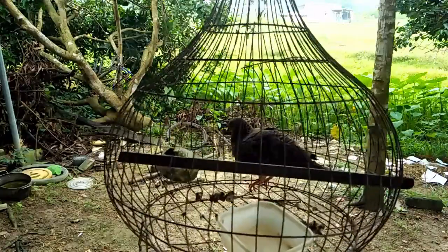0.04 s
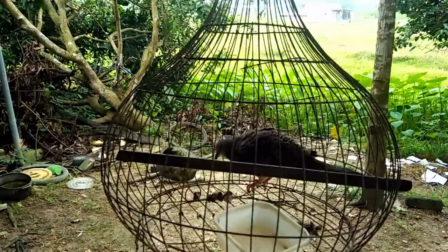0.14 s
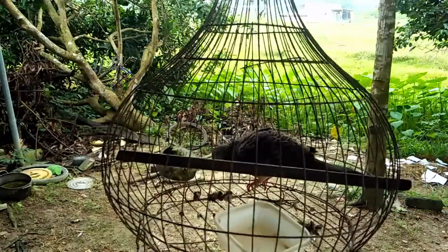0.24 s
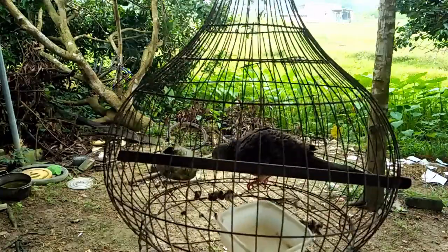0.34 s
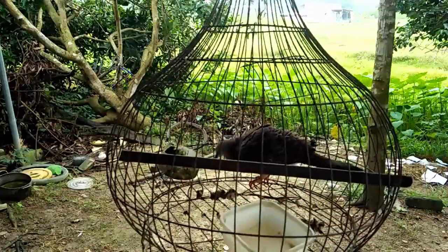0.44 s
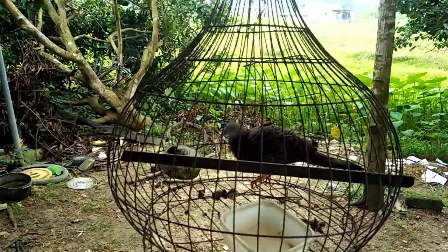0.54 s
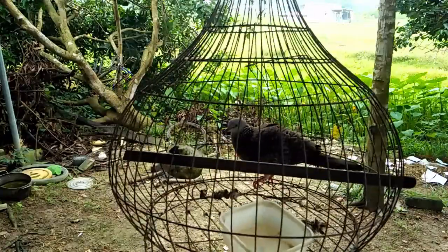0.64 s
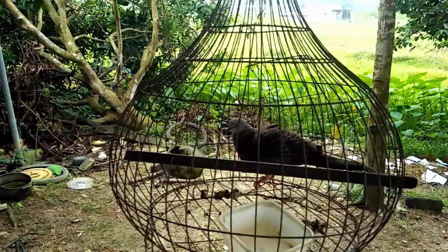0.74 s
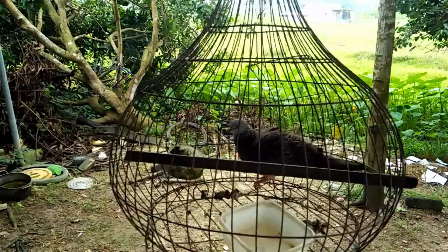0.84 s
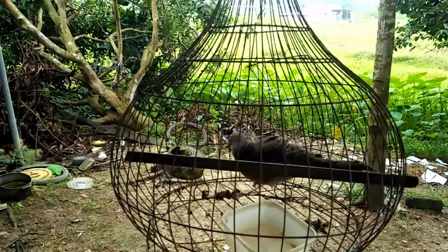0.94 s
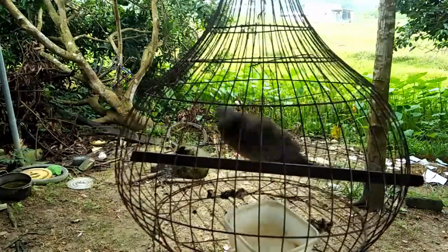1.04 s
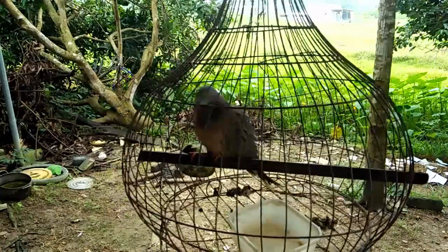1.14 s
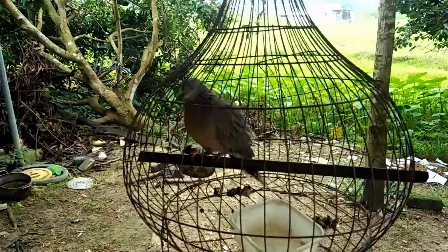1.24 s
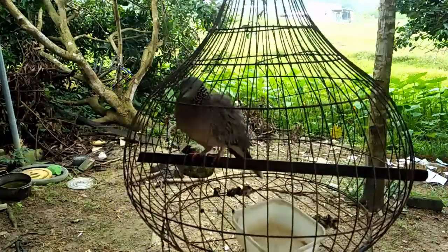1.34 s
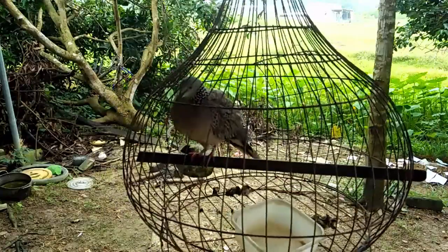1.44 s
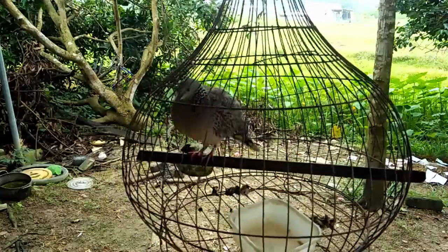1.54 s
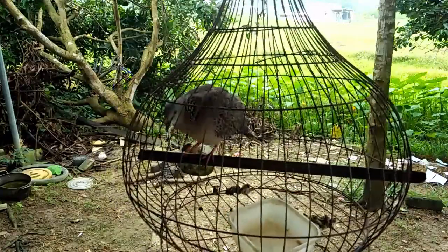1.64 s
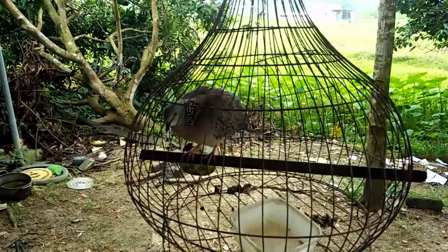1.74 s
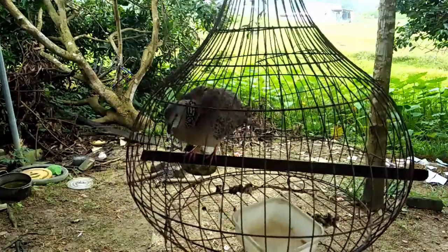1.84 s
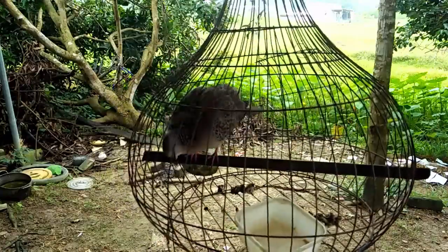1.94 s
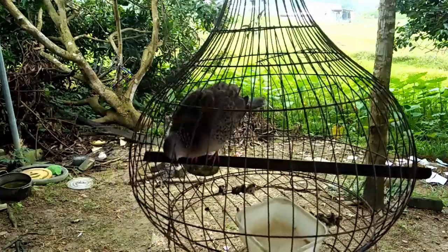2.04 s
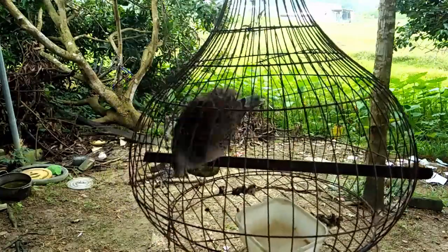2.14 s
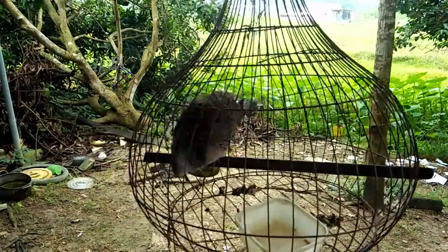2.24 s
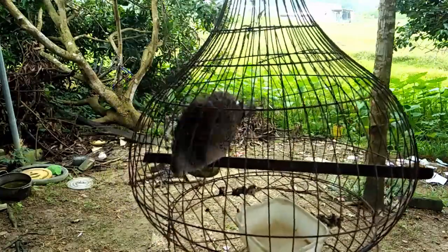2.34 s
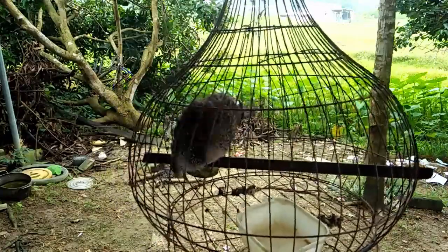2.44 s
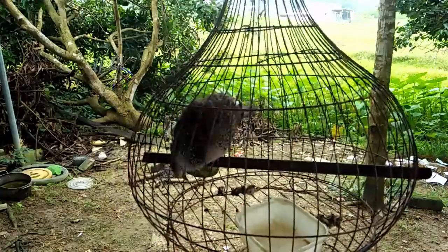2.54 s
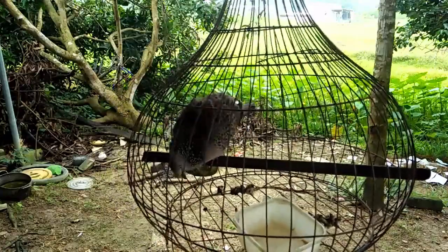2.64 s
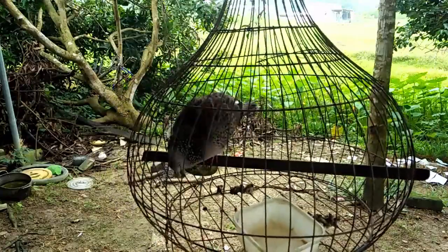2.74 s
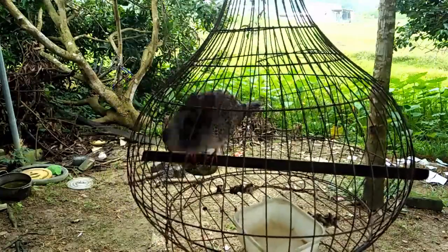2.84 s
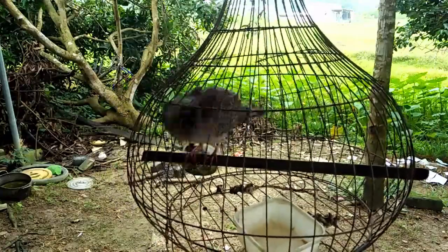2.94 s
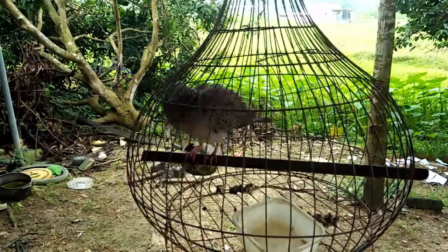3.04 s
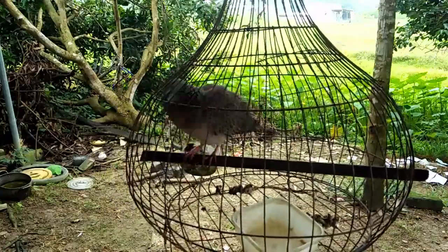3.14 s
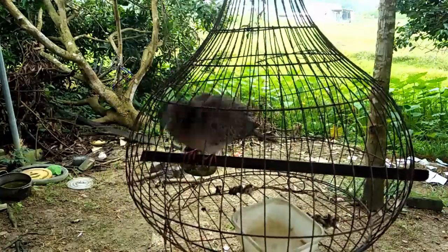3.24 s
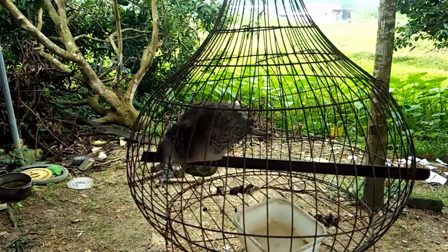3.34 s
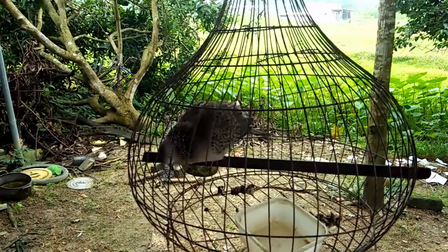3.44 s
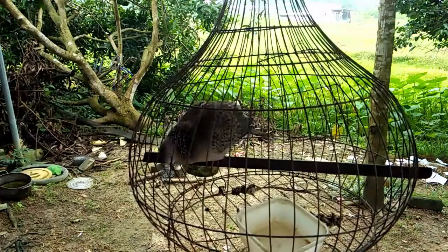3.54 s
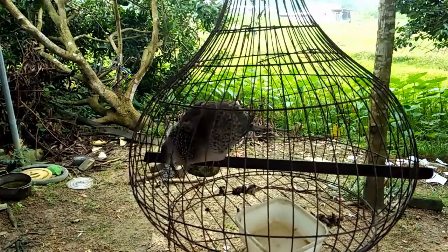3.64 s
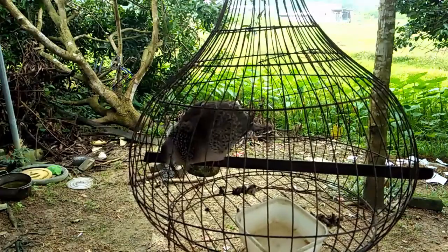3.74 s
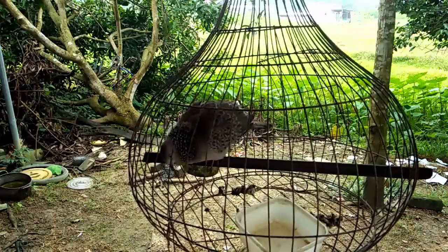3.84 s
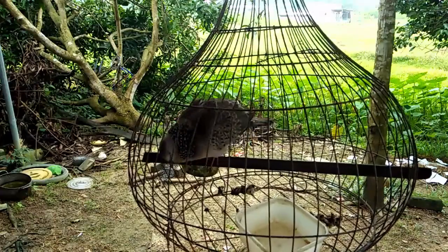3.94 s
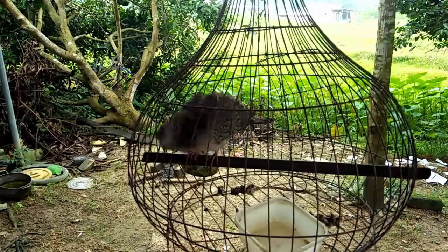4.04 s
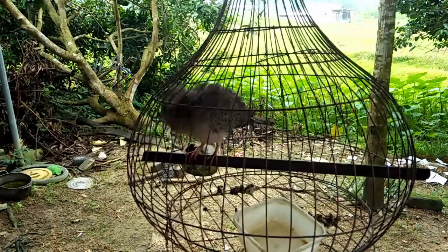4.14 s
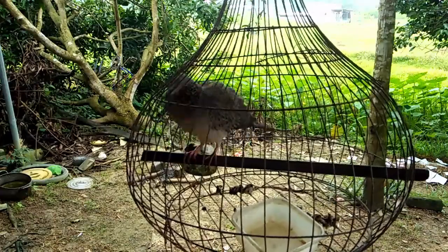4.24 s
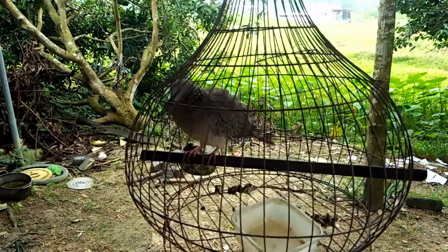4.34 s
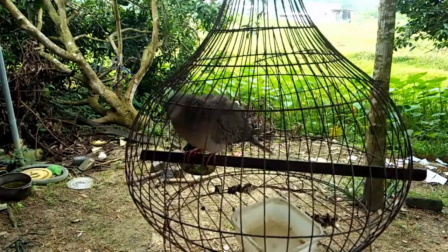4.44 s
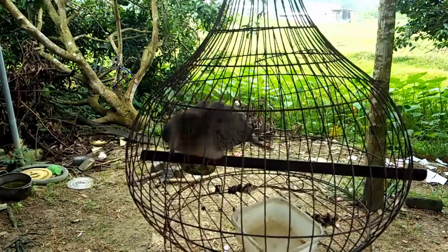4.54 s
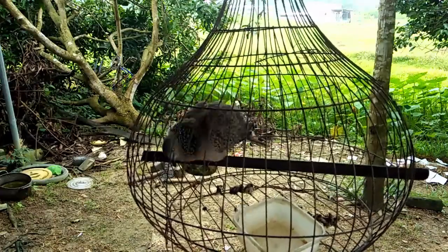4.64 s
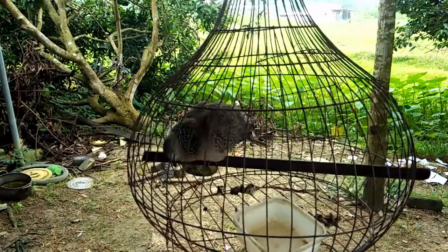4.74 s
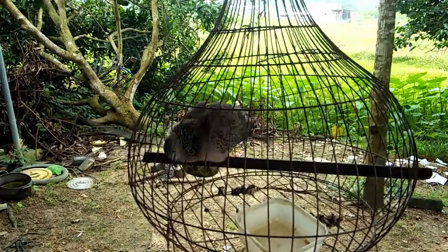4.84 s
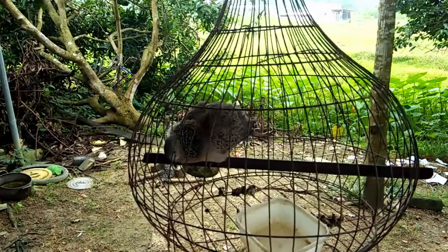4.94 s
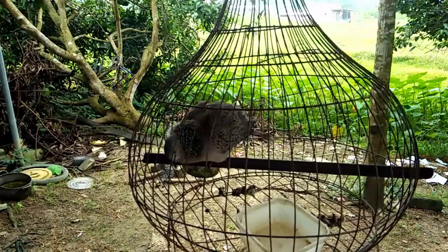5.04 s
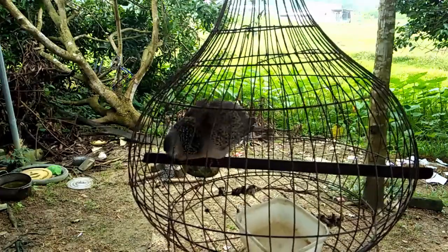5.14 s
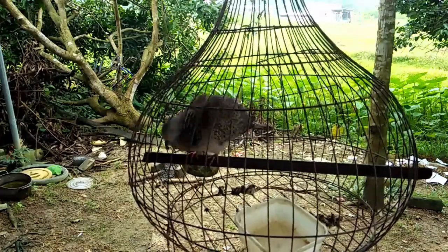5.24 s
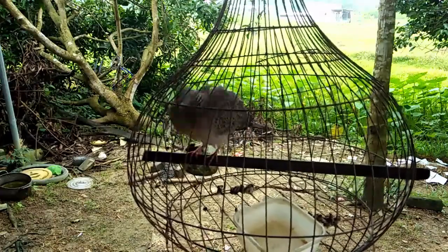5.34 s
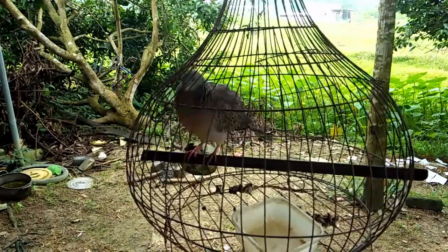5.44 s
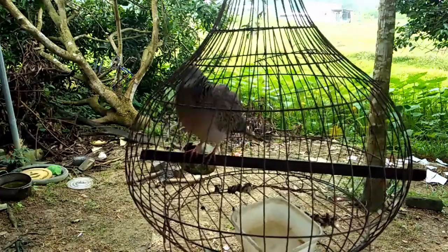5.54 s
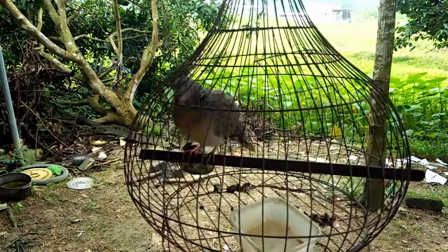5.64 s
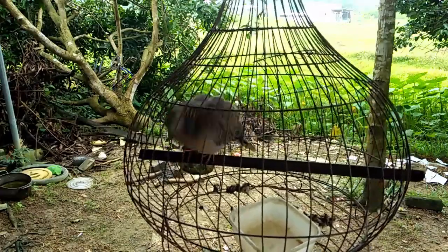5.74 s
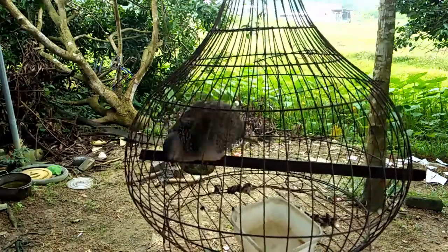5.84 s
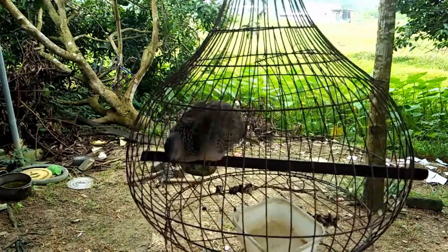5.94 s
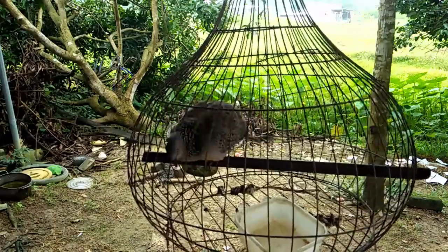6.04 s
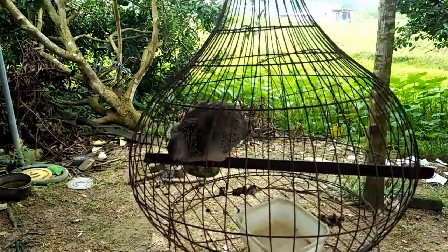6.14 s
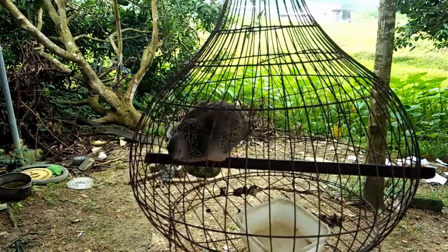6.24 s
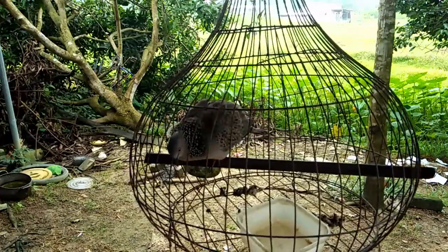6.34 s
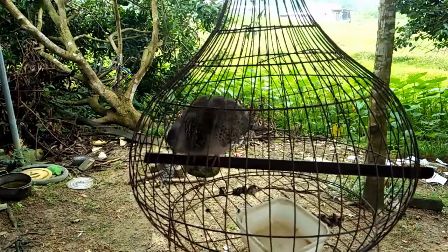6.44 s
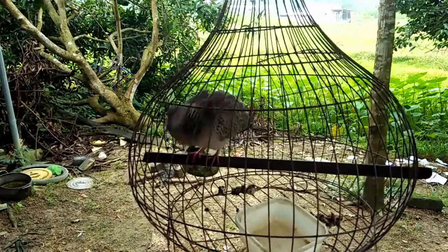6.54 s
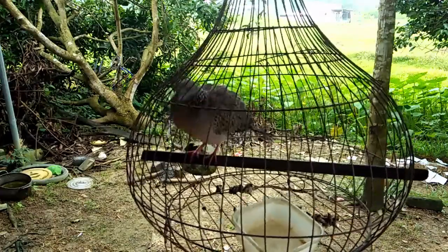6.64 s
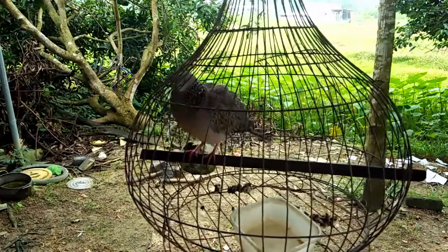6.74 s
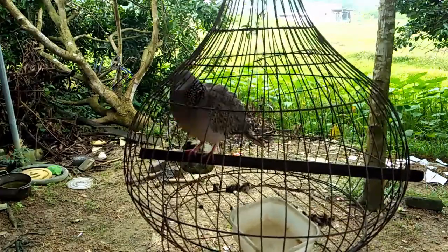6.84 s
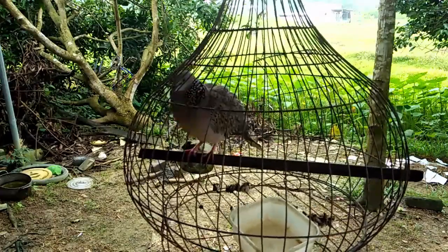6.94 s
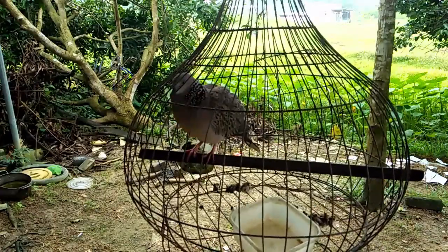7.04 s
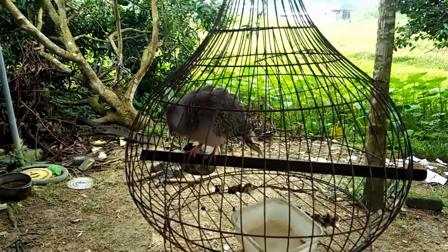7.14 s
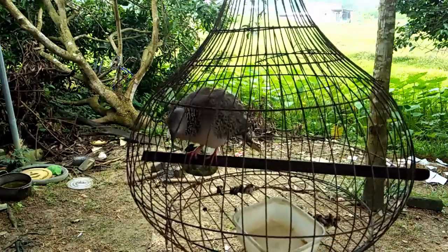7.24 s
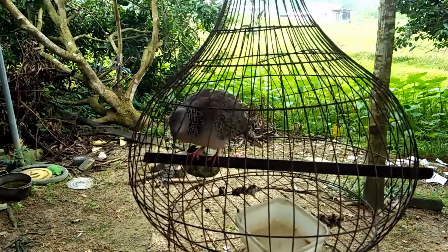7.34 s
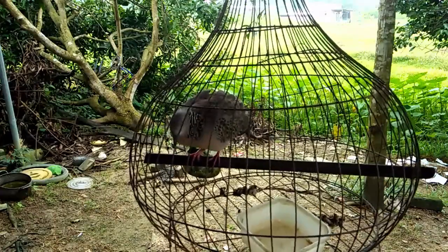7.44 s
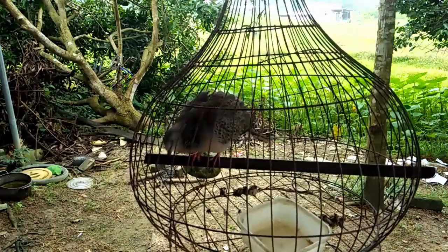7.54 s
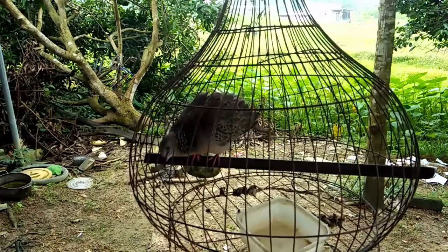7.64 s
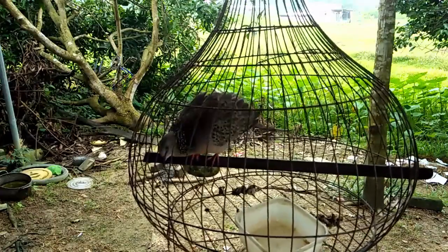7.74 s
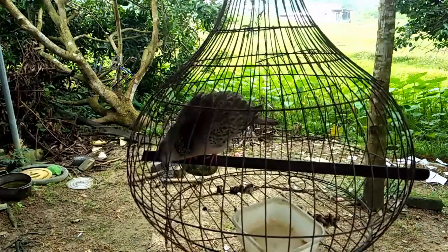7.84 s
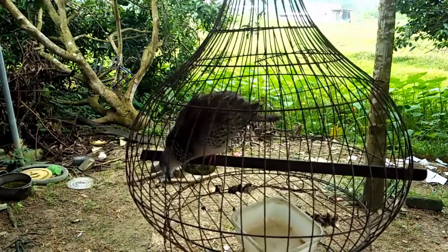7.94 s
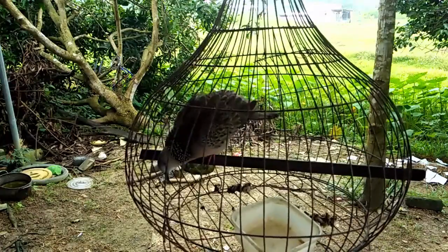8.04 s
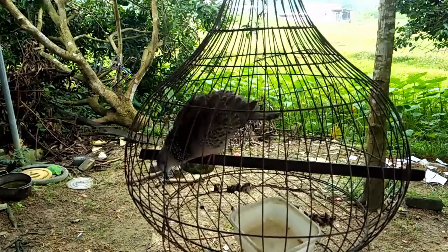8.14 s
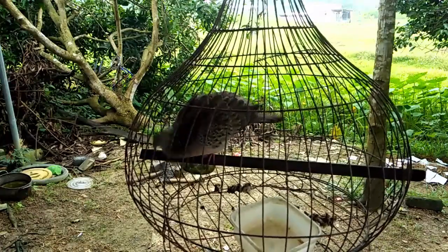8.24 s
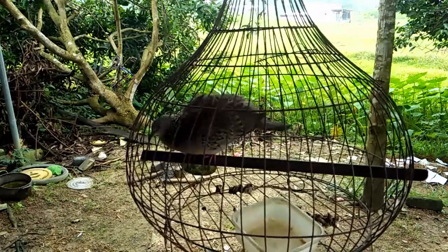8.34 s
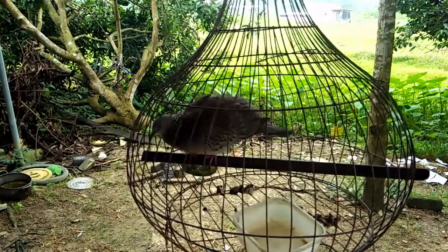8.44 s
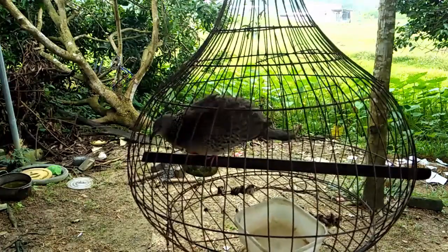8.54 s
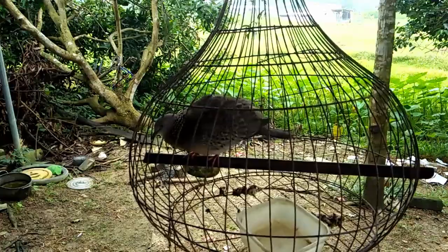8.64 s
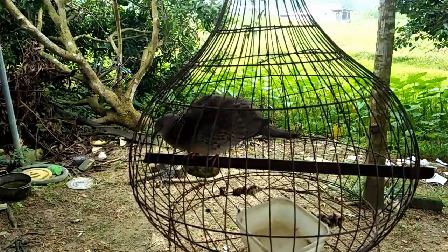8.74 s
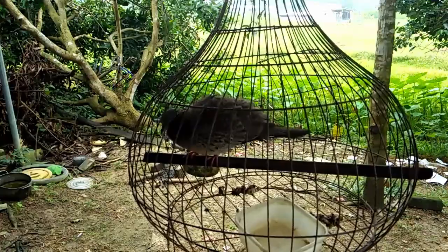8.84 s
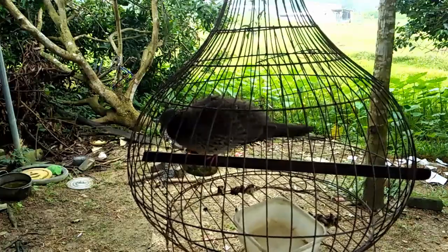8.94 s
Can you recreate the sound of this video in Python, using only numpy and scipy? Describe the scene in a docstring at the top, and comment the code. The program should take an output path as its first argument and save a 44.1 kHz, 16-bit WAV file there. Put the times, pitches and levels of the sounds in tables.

```python
"""A dove coos in pairs, short then long, close to a phone in a garden; another answers from further off.
Its gliding, rolling coo rings at two resonances, played as an upper and a lower band. Fowl call far away,
claws scrape the perch, and wind bumps the microphone over a bed of leaves and distant traffic.
The phone changes its sample rate by dropping samples, which adds faint high images of the coos."""
import sys
import numpy as np
from scipy import signal
from scipy.fft import rfft, irfft, next_fast_len
from scipy.io import wavfile
from scipy.ndimage import uniform_filter1d, map_coordinates

SR = 44100
rng = np.random.default_rng(int(sys.argv[2]) if len(sys.argv) > 2 else 0)


def file_out(sig):
    """Save sig as 16-bit WAV at sys.argv[1]."""
    # one column per channel
    cols = np.atleast_2d(sig).T
    # limit, then scale
    lim = np.clip(cols, -1, 1)
    pcm = np.round(lim * 32767).astype(np.int16)
    wavfile.write(sys.argv[1], SR, pcm)


N = 396018
T = np.arange(N) / SR

# The near dove's short coos: (start [s], length [s], level [dB], upper band [Hz],
# sag of the lower band [Hz], fade of the upper band [dB], throat click [dB])
SHORT_CALLS = [(2.199, 0.2081, -22.5, 722.9, 130, 16.5, -38.5), (3.374, .23, -23.5, 726, 9.2, 1, -45),
               (4.593, .21, -21.5, 720.8, 20, 6, -44.5), (5.837, .21, -22, 721, 9.4, 1, -47)]


def undb(db):
    """Gain of a dB value."""
    return 10 ** (np.asarray(db) / 20)


def unit(x):
    """Scaled to rms 1."""
    return x / np.sqrt(np.mean(np.abs(x) ** 2))


def colour(x, points):
    """EQ with a curve of (frequency [Hz], gain [dB]) points."""
    hz, db = np.transpose(points)
    size = next_fast_len(N)
    bin_hz = np.arange(size // 2 + 1) * SR / size + 1
    gain = undb(np.interp(np.log(bin_hz), np.log(hz), db))
    return irfft(rfft(x, size) * gain, size)[:N]


def wobble(width_hz, size=N):
    """Narrow-band complex noise: a wandering level and phase."""
    noise = rng.standard_normal((2, size // 8 + 600))
    lowpass = signal.butter(2, np.clip(width_hz, .1, 2000) / 2, fs=SR / 8, output="sos")
    slow = signal.sosfilt(lowpass, noise)[:, 598:]
    real, imag = (np.interp(np.arange(size) / 8, np.arange(len(part)), part) for part in slow)
    return unit(real + 1j * imag)


def drift(rate_hz):
    """Smooth random modulation of rms 1."""
    return unit(wobble(2 * rate_hz).real)


def garden(level_db=-70):
    """A bed of leaves and distant traffic, swelling a little."""
    # Tone of the bed: (frequency [Hz], gain [dB])
    bed_eq = [(150, -24.5), (230, -6.5), (800, -3.5), (1000, -1), (2500, -14), (9800, -25), (11500, -24),
              (13500, -44.5), (15600, -70)]
    return undb(level_db + 0.67 * drift(1.5)) * unit(colour(rng.standard_normal(N), bed_eq))


def wind(rumble_db=-63.5, gust_db=3, bump_hz=106, weak_count=10, weak_db=-44.5):
    """Gusty turbulence on the microphone, with low bumps of about a cycle and a half."""
    # Tone of the rumble: (frequency [Hz], gain [dB])
    rumble_eq = [(20, -27.5), (35, -10.5), (50, -0.5), (125, -1.5), (160, -2.5), (200, -22.5), (260, -40)]
    # Placed bumps: (time [s], peak [dB])
    placed_bumps = [(0.293, -46), (0.375, -45), (0.396, -49), (2.034, -46.5), (3.746, -43), (3.971, -44),
                    (5.83, -50.5), (5.86, -44), (5.914, -41), (7.461, -41), (7.521, -45.5), (7.698, -45)]
    gusts = undb(gust_db * drift(41) + 2.0 * drift(1.0))
    out = undb(rumble_db) * unit(colour(gusts * rng.standard_normal(N), rumble_eq))
    chance_bumps = [(time, weak_db) for time in rng.uniform(.1, T[-1] - .1, weak_count)]
    t = T[:SR // 10] - T[SR // 20]
    for time, db in chance_bumps + placed_bumps:
        detune, phase = rng.standard_normal(2)
        hz = bump_hz * np.exp(.12 * detune)
        envelope = undb(db) * np.exp(-(t * hz / 0.67) ** 2)
        at = int(time * SR) - SR // 20
        out[at:at + len(t)] += envelope * np.cos(2 * np.pi * (hz * t + phase))
    return out


def distant_calls():
    """Far-off birds, mostly fowl: each partial flickers in level and pitch within its width."""
    # Partials and hoarse bands: (start [s], length [s], pitch [Hz], width [Hz], level [dB])
    # The last row is the faint, hoarse third harmonic of the far dove's last coo.
    partials = [(0.16, 0.18, 658, 30, -76), (0.157, 0.18, 980, 30, -69.5), (.58, 0.14, 290, 25, -72),
                (0.598, 0.027, 1050, 60, -67), (1.966, 0.23, 658, 40.3, -66),
                (2.043, 0.16, 993, 22.4, -66.5), (2.047, .1, 1300, 90, -67), (4.28, 0.17, 1445, 254, -59),
                (4.558, 0.045, 1977, 248, -61.5), (4.558, 0.062, 717, 80.5, -46.5),
                (5.499, 0.055, 1655, 201, -66), (5.53, 0.17, 1175, 35, -70.5),
                (6.454, 0.14, 1499, 800, -57.5), (6.455, .07, 2820, 1018, -65),
                (7.493, 0.23, 1476, 29.9, -65.5), (7.683, 0.27, 1000, 151, -64.5),
                (7.689, 0.17, 787, 60, -68.5), (7.72, 0.27, 1505, 35, -62.5), (7.736, .26, 1624, 25, -61.5),
                (7.74, .58, 1727, 850, -65.5), (7.738, .2, 2920, 120, -80), (8.032, 0.2, 2850, 150, -76.5),
                (7.759, 0.099, 1990, 80, -69), (8.058, 0.17, 2020, 200, -72),
                (7.927, 0.16, 780, 39.2, -60.5), (7.943, 0.29, 969, 100, -61.5),
                (7.969, .3, 1513, 40, -55.5), (8.27, 0.102, 1520, 30, -70), (8.606, .36, 2010, 197, -76.5)]
    out = np.zeros(N)
    for start, length, hz, width_hz, db in partials:
        at = int(start * SR)
        t = T[:int(length * SR)]
        envelope = undb(db) * np.sin(np.pi * t / length).clip(0) ** 0.42
        tone = (wobble(width_hz, size=len(t)) * np.exp(2j * np.pi * hz * t)).real
        out[at:at + len(t)] += envelope * tone
    return np.sqrt(2) * out


def claws():
    """A bright tick, then a grainy scrape that swells and dies away, coloured by perch and wire."""
    # Claw strokes: (time [s], rise [s], scrape level [dB], relative tick level [dB])
    strokes = [(1.162, .011, -55, -80), (1.196, .011, -61, -80), (1.247, .002, -64, -50),
               (1.2575, .013, -61, -38), (4.035, .012, -64, -80)]
    # Resonances of the perch: (frequency [Hz], gain [dB])
    perch_eq = [(500, -15), (900, -4), (1700, -13), (2600, -3), (3800, -32), (5400, -15.5), (8600, -10),
                (13600, -20), (15500, -27)]
    scrape, ticks = np.zeros(N), np.zeros(N)
    for time, rise, scrape_db, tick_db in strokes:
        age = (T - time).clip(0) / rise
        scrape += undb(scrape_db) * age * np.exp(1 - age)
        ticks[int(time * SR)] = undb(tick_db)
    grain = unit(colour(rng.standard_normal(N) * undb(0.83 * drift(370)), perch_eq))
    return scrape * grain + undb(22.5) * colour(np.gradient(ticks), perch_eq)


def echo(x, t60_s=0.38, level_db=-13, predelay_s=.025):
    """Walls and trees send back a short, late tail."""
    t = T[:SR // 2]
    tail = rng.standard_normal(len(t)) * np.exp(-np.log(1000) * t / t60_s) * (t > predelay_s)
    return undb(level_db) * signal.fftconvolve(x, tail / np.sqrt(np.sum(tail ** 2)))[:N]


def contours(coos):
    """Breakpoints joined into curves: level and frequency of the upper band, then of the lower."""
    times, *columns = np.concatenate(coos).T
    return [np.interp(T, times, column) for column in columns]


def band(coos, db, hz, scoop=0, fade_s=0.011):
    """One resonance as a phasor, silent between coos; scoop bends it up into a coo and down at the end."""
    starts, ends = np.array([(coo[0][0], coo[-1][0]) for coo in coos]).T
    current = (np.searchsorted(starts - .02, T) - 1).clip(0)
    gate = uniform_filter1d(1. * (T > starts[current]) * (T < ends[current]), int(fade_s * SR))
    rise = np.exp(-((T - starts[current]) / 0.024) ** 2)
    sag = np.exp(-((T - ends[current]) / 0.075) ** 2)
    bent_hz = hz * (1 - scoop * rise - 0.17 * scoop * sag)
    return np.sqrt(2) * gate * undb(db) * np.exp(2j * np.pi * np.cumsum(bent_hz) / SR)


def rough(share, width_hz):
    """Hoarseness: a steady part plus a noisy share of the vibration."""
    return np.sqrt(1 - share ** 2) + share * wobble(width_hz)


def chance_slips(per_s, mean_dip_db=-13):
    """Unevenly spaced slips: (time [s], dip [dB])."""
    jitter, depth = rng.random((int(per_s * T[-1]), 2)).T
    return np.transpose([(np.arange(len(jitter)) + jitter) / per_s, 2 * mean_dip_db * depth])


def roll(slips, blend_s):
    """At each slip the ringing jumps in phase; old and new overlap and partly cancel in a dip."""
    times, dip_db = np.transpose(slips)
    angles = 2 * np.arccos(undb(dip_db.clip(-40, 0)))
    jumps = np.zeros(N)
    jumps[(times * SR).astype(int)] = angles * rng.choice([-1, 1], len(times))
    window = np.hanning(int(blend_s * SR))
    return signal.fftconvolve(np.exp(1j * np.cumsum(jumps)), window / window.sum(), "same")


def voice(upper, lower, octave_db):
    """Both bands, with the faint octave of an uneven vibration, through the closed throat."""
    # Tone of the throat: (frequency [Hz], gain [dB])
    throat_eq = [(200, -37), (300, -8), (430, -6.5), (880, 4.5), (1050, -8), (1300, 2.5)]
    both = upper + lower
    phasor = both / (np.abs(both) + 1e-5)
    octave = undb(octave_db) * both * phasor * rough(0.52, 120)
    return colour((both + octave).real, throat_eq)


def far_dove():
    """The answering dove: many paths blur its coo into a flutter."""
    # Breakpoints of each coo, levels relative:
    # (time [s], upper level [dB], upper band [Hz], lower level [dB], lower band [Hz])
    coos = [
        [(4.24, -58, 710, -43, 595), (4.386, -42, 715, -57.5, 619), (4.52, -64.5, 715, -65, 635)],
        [(6.62, -42, 711, -52.5, 617), (7.0, -58, 688, -51, 597), (7.15, -89.5, 677, -53.5, 562)],
        [(8.2, -62, 686, -58, 592), (8.232, -56, 687, -45, 592), (8.36, -54.5, 688, -63.5, 596)],
        [(8.38, -60, 686, -51, 589), (8.436, -52, 686, -45.5, 589), (8.56, -61, 687, -76, 596)],
        [(8.61, -60, 727, -55, 625), (8.66, -44, 728, -55.5, 628), (8.98, -49.5, 709, -50, 618)],
    ]
    upper_db, upper_hz, lower_db, lower_hz = contours(coos)
    flutter = roll(chance_slips(per_s=35), blend_s=0.017)
    upper = band(coos, upper_db - 1, upper_hz) * flutter * rough(0.4, 110)
    lower = band(coos, lower_db + 2.5, lower_hz, scoop=0.032) * flutter * rough(0.52, 80)
    return voice(upper, lower, octave_db=-25.5)


def near_coos(lower_hz=623.2, lower_fade_share=0.15):
    """Breakpoints of the near dove's coos: a short or long shape, stretched, tuned and levelled."""
    # Long coos: (start [s], length [s], level [dB], upper band [Hz],
    # sag of the lower band [Hz], fade of the upper band [dB])
    long_calls = [(2.527, 0.56, -19, 720, 10, 0.65), (3.674, 0.53, -18, 727.5, 10, -0.1),
                  (4.893, 0.49, -17, 732.4, 10, 0.66), (6.12, 0.48, -16.5, 724.5, 10, 1.2)]
    # Course of a coo: (position [0-1], upper level [dB], upper bend [Hz], lower level [dB])
    short_shape = [(0, -27.5, 15, -32.5), (0.089, -14.5, -11.5, -4.5), (0.179, 1.5, 2, -6.5),
                   (.45, 0, -1, -6.5), (.6, -5, -6.5, 3.5), (.8, -18.5, -10, -7), (1, -26.5, -8, -18.5)]
    long_shape = [(0, -43.5, -20, -38), (0.039, -31.5, -31.5, -11.5), (.08, -8.5, 0.5, -9.5),
                  (.2, -5.5, -15, -17), (.45, -2.5, -2.5, -19.5), (0.599, 0, 2.5, -25.5),
                  (.73, -4, -25.5, -20.5), (.87, -11.5, -66, -11), (1, -29, -71, -22.5)]
    calls = [(call, short_shape) for call in SHORT_CALLS] + [(call, long_shape) for call in long_calls]
    coos = []
    for (start, length, db, upper_hz, sag_hz, fade_db, *_), shape in sorted(calls):
        coos.append([(start + position * length,
                      db + upper_db - fade_db * position, upper_hz + bend_hz,
                      db + lower_db - fade_db * lower_fade_share, lower_hz - sag_hz * position ** 2)
                     for position, upper_db, bend_hz, lower_db in shape])
    return coos


def near_dove(steady_above_db=-21, click_hz=1050):
    """A clear, rolling upper band over a hoarser lower one; a throat click opens each short coo."""
    # Main slips of the upper band: (time [s], dip [dB])
    main_slips = [(2.232, -21), (2.615, -22), (2.713, -29.5), (2.755, -25.5), (2.803, -18), (2.84, -12.5),
                  (2.893, -11), (2.925, -16.5), (2.937, -24), (3.444, -24.5), (3.782, -22.5),
                  (3.838, -18.5), (3.896, -25), (3.927, -27.5), (3.959, -13.5), (4.011, -12), (4.03, -26),
                  (4.681, -17), (4.976, -27), (5.027, -31.5), (5.047, -16), (5.263, -14), (5.92, -21),
                  (6.22, -11), (6.234, -22.5), (6.259, -11), (6.299, -12), (6.316, -10), (6.411, -6),
                  (6.45, -15), (6.495, -18)]
    coos = near_coos()
    upper_db, upper_hz, lower_db, lower_hz = contours(coos)
    # Chance slips fall between the main ones and stop while the upper band is at full strength.
    fill = chance_slips(per_s=28)
    apart = np.abs(fill[:, :1] - np.array(main_slips)[:, 0]).min(axis=1) > .014
    soft = upper_db[(fill[:, 0] * SR).astype(int)] < steady_above_db
    fill[:, 1] *= apart * soft
    rolling = roll(np.concatenate([main_slips, fill]), blend_s=0.016)
    hoarseness = np.interp(upper_db, [-23.5, -17.5], [0.43, 0.099])  # clears as the band swells
    upper = band(coos, upper_db, upper_hz) * rolling * rough(hoarseness, 100)
    lower = band(coos, lower_db, lower_hz, scoop=.25) * rough(0.55, 80)
    out = voice(upper, lower, octave_db=-41)
    t = T[:400] - T[200]
    click = np.exp(-(t / .0012) ** 2) * np.sin(2 * np.pi * click_hz * t)
    for start, *_, click_db in SHORT_CALLS:
        at = int((start + .005) * SR) - 200
        out[at:at + len(t)] += undb(click_db) * click
    return out


def scene():
    """The mono mix, with an echo on the coos."""
    doves = near_dove() + far_dove()
    return (doves + echo(doves) + distant_calls() + claws() + wind() + garden())[None]


def record(dry, capture_hz=48000, top_hz=15500):
    """The phone keeps the nearest sample: the timing error mirrors the coo around multiples of 3.9 kHz."""
    nearest = np.round(np.arange(N) * capture_hz / SR) * SR / capture_hz
    held = map_coordinates(dry[0], [nearest], order=3, mode="nearest")
    lowpass = signal.ellip(10, .2, 70, top_hz, fs=SR, output="sos")
    return signal.sosfilt(lowpass, held)[None]


dry = scene()
out = record(dry)
file_out(out)
```